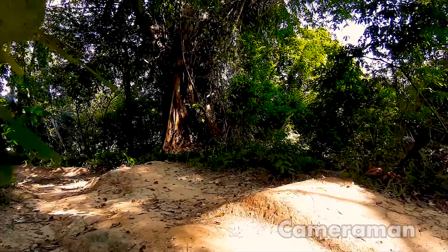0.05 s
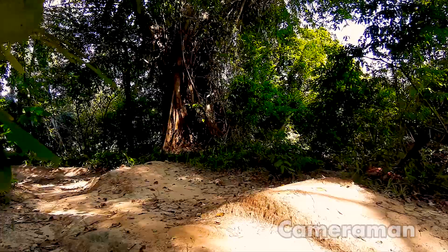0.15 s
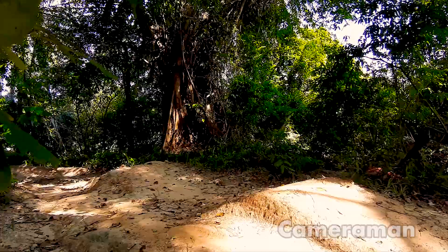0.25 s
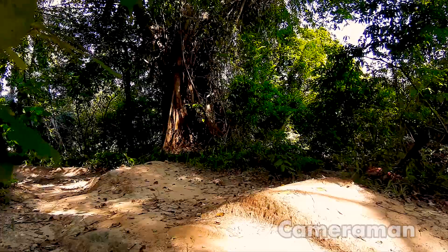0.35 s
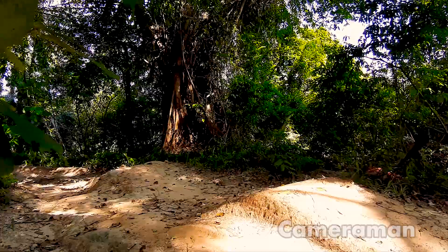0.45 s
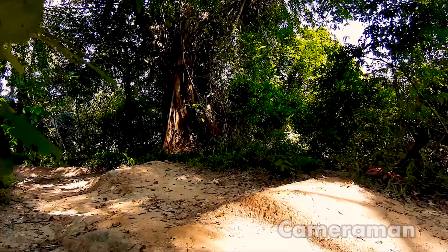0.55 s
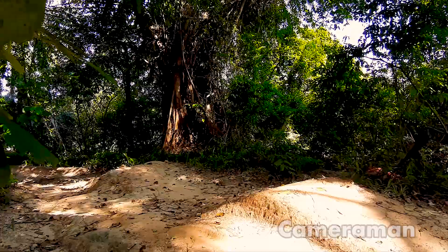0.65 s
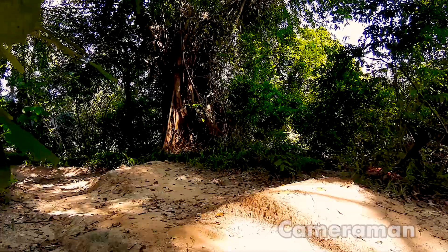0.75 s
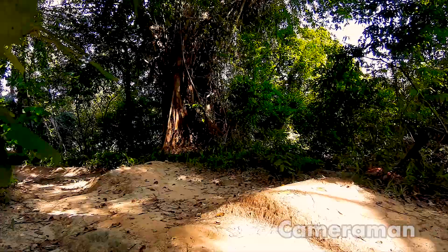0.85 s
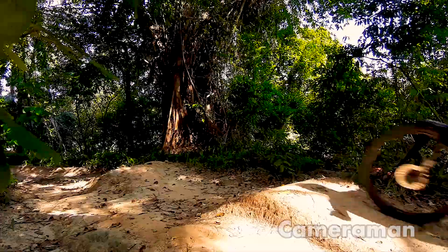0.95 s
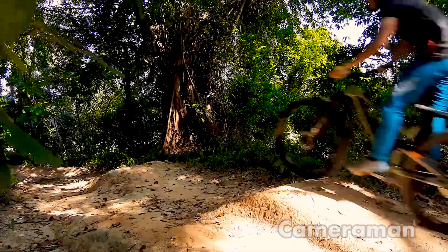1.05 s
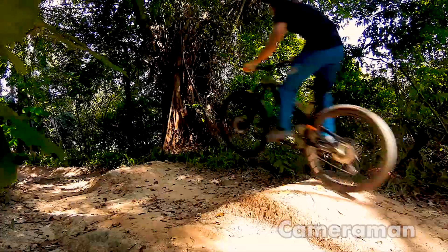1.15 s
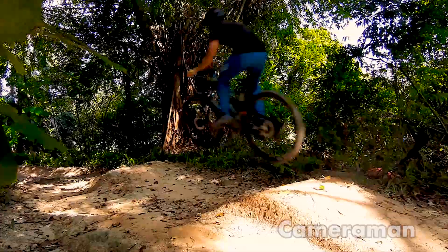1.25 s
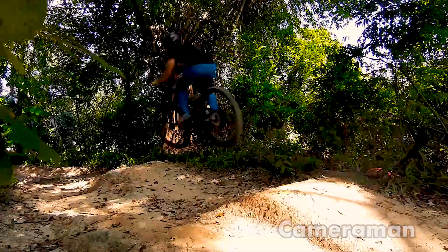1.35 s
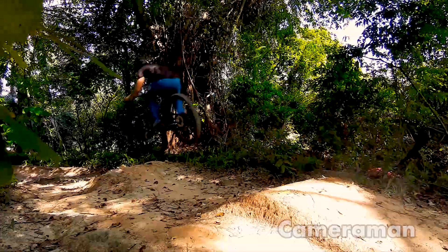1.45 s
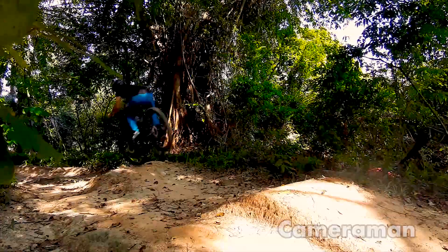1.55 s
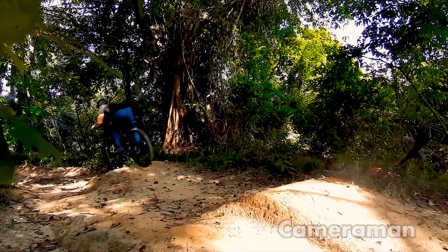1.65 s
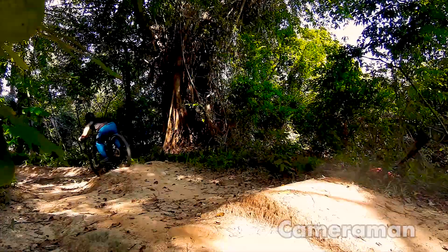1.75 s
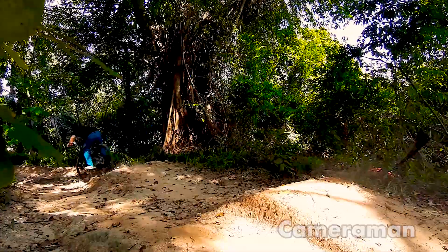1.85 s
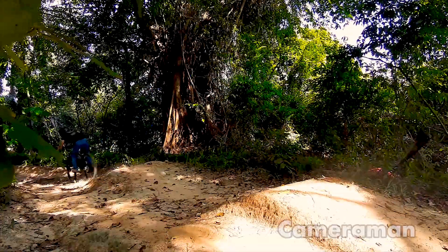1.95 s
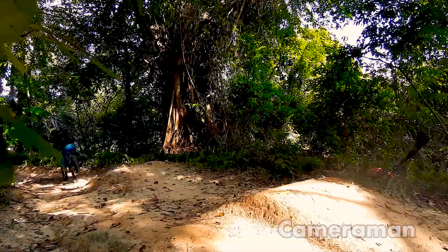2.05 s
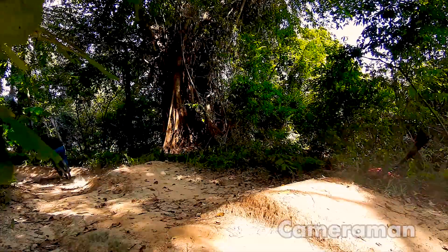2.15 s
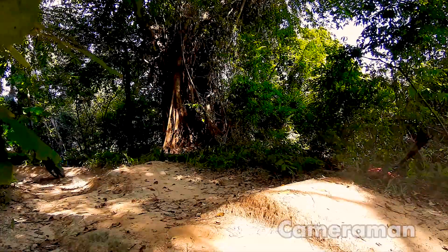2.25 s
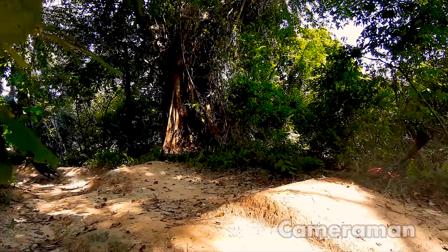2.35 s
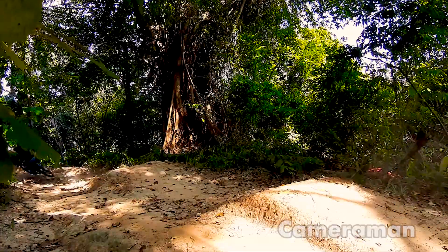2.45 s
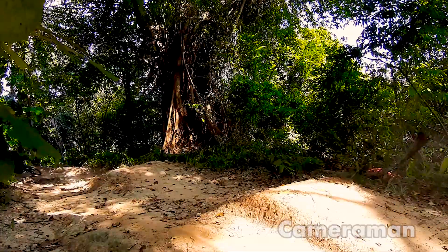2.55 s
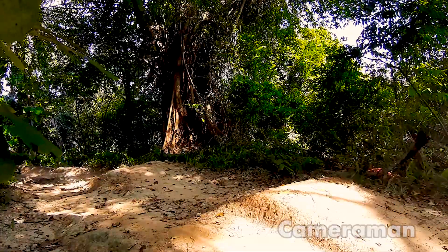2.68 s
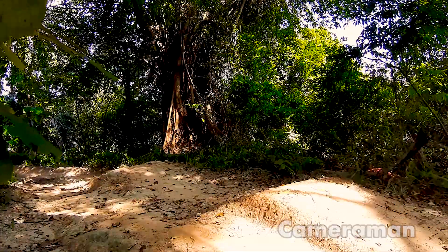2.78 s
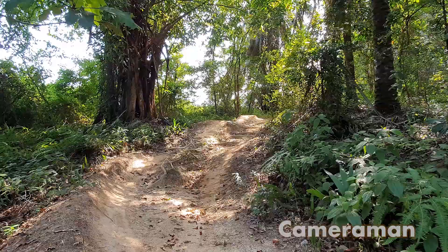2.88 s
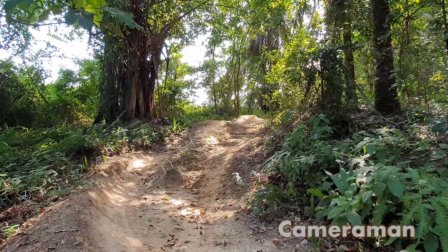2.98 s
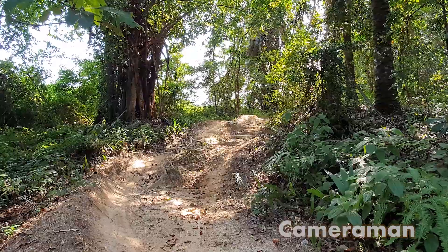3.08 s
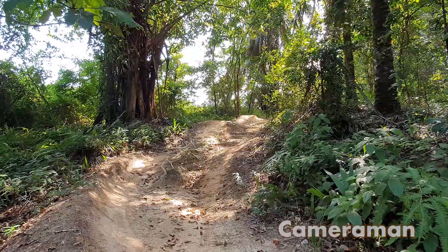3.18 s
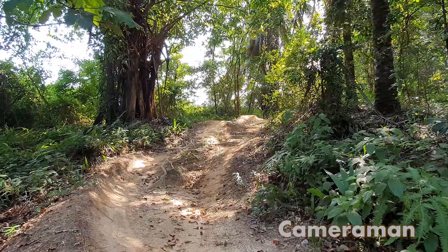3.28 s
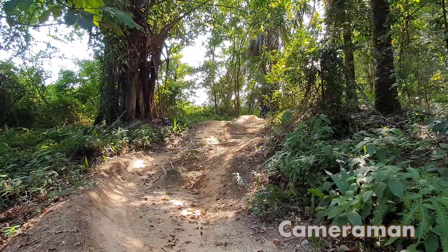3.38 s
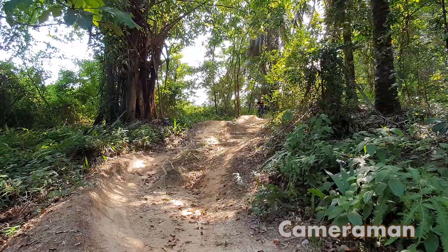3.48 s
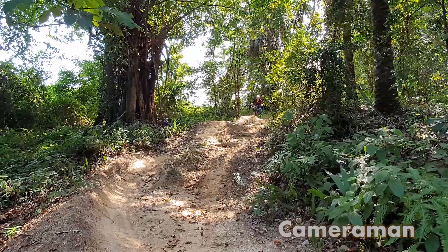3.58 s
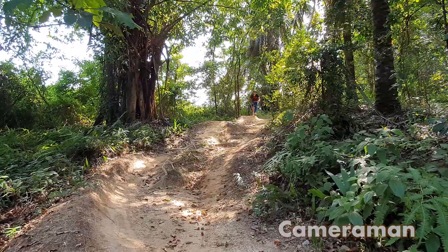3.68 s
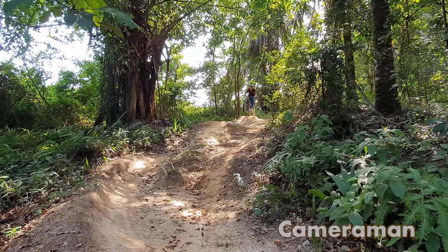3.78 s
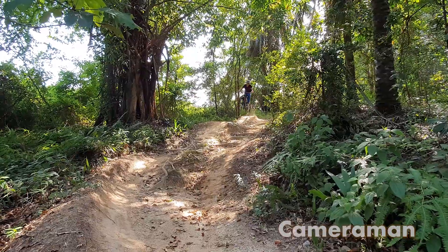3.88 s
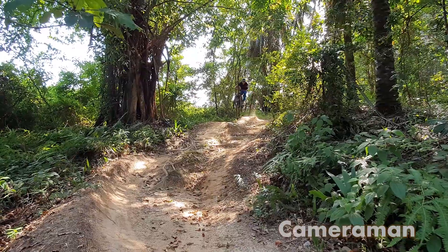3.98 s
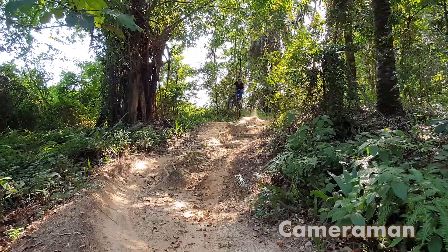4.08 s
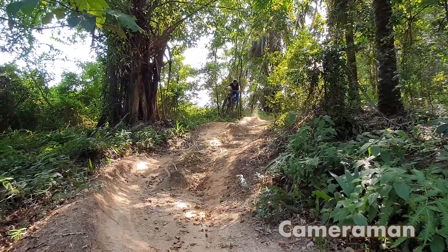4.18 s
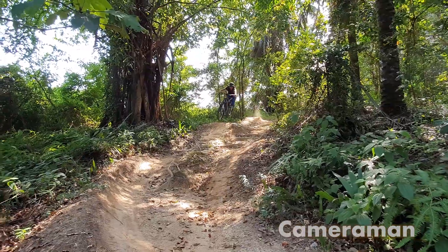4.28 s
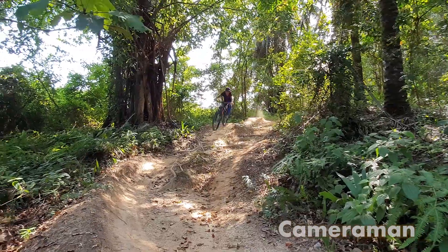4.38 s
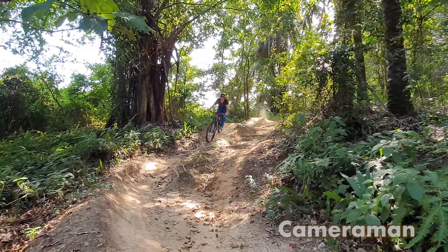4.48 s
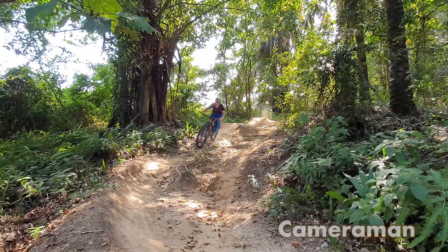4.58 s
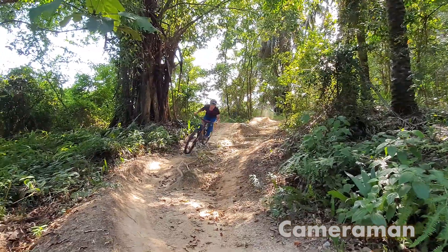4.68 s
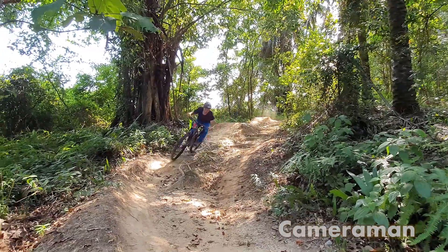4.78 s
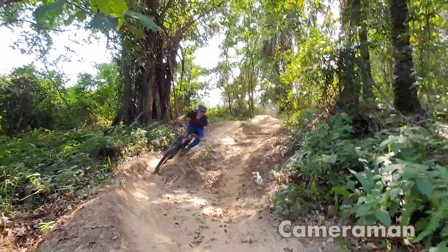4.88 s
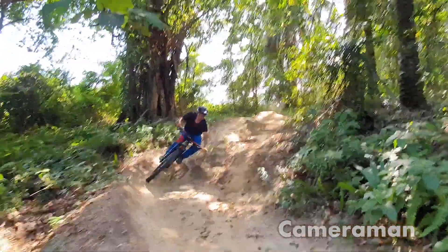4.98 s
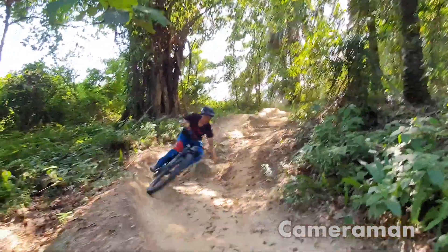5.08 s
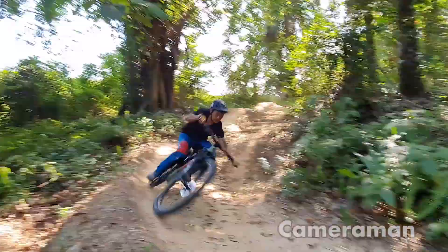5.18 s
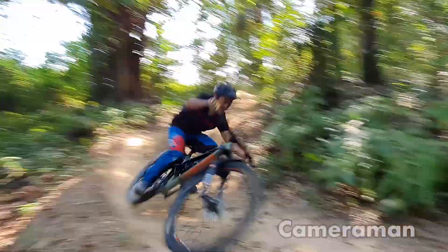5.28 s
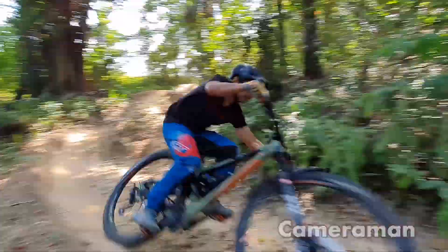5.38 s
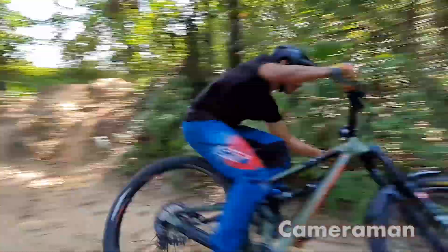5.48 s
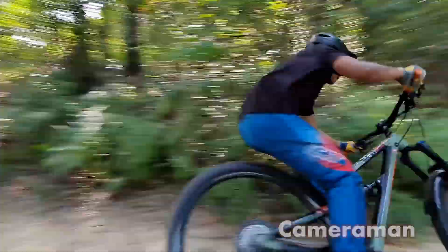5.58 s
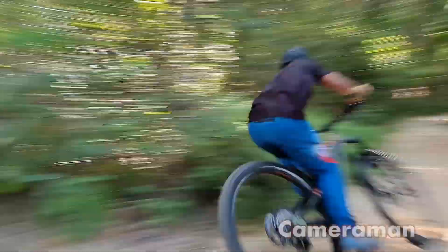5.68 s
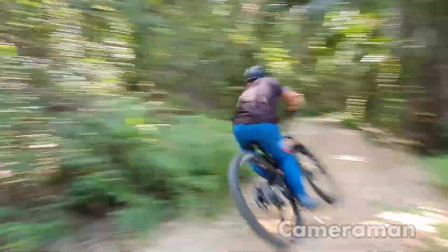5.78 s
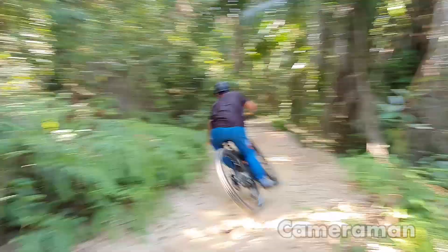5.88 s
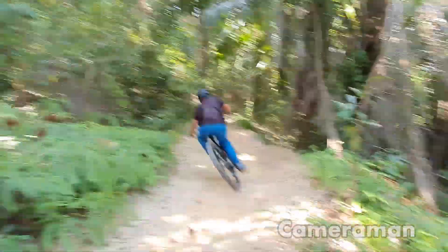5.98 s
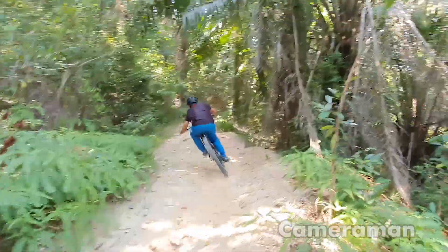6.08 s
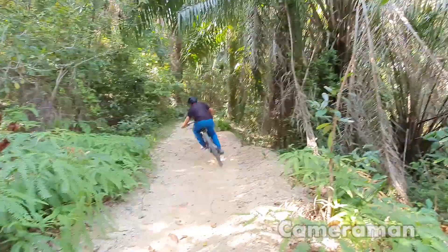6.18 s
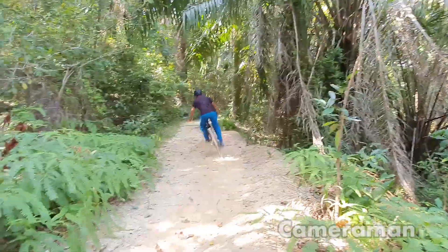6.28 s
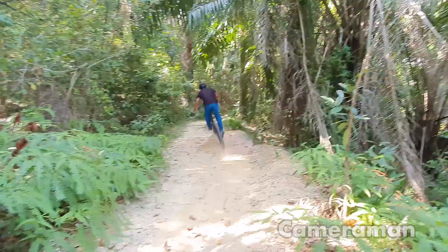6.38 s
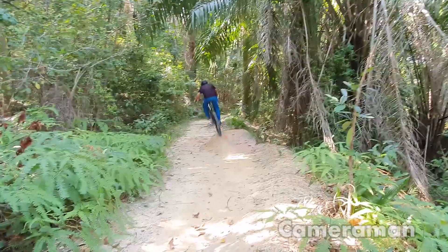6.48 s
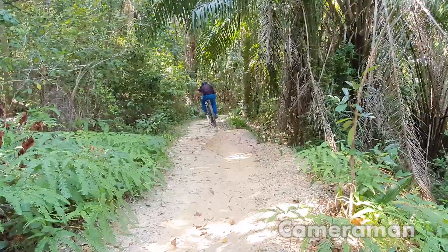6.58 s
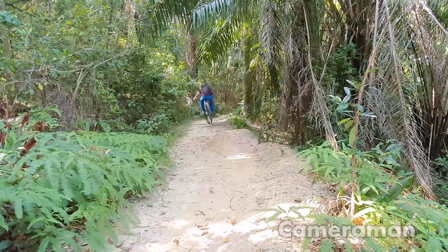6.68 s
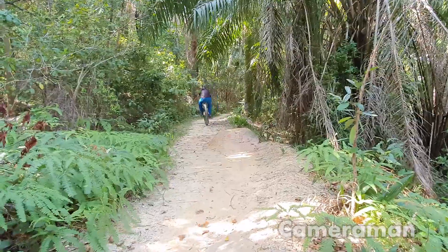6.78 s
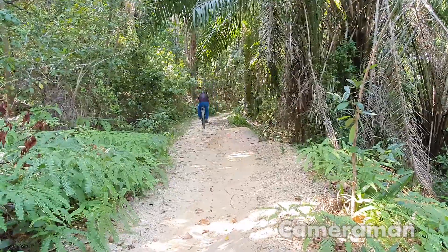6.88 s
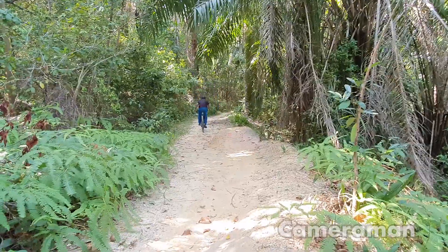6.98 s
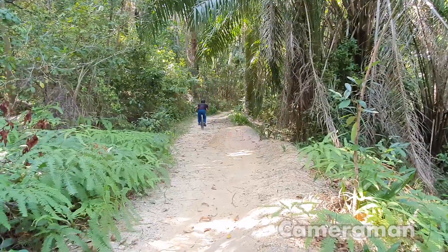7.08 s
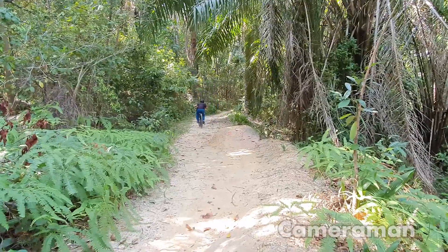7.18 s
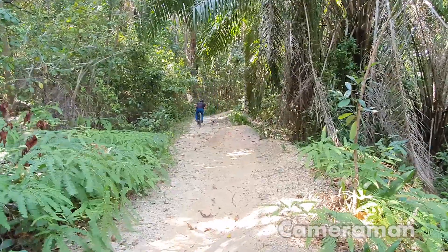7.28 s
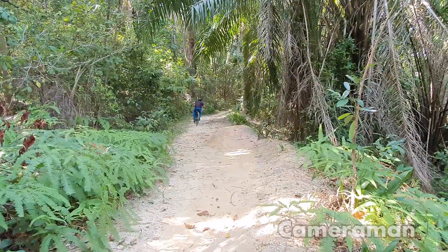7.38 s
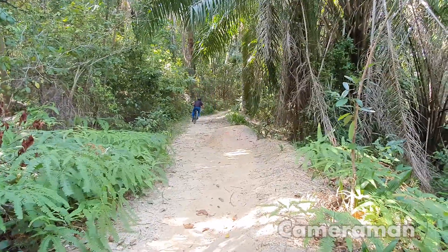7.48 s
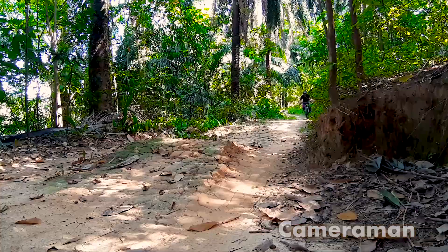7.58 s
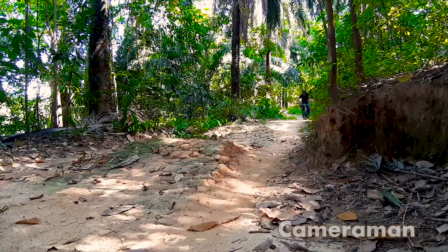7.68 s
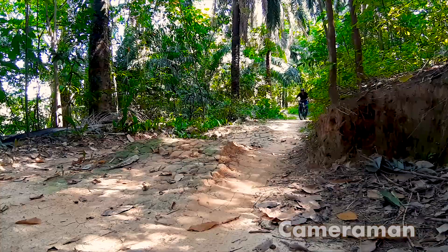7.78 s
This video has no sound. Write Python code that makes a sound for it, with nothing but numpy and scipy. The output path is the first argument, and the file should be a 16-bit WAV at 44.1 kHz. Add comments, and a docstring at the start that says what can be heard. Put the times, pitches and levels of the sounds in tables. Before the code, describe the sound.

A mountain bike rumbles up a dirt jump, lands with a thud, then swoops close past through a gritty forest berm with buffeting wind.

```python
"""Mountain bike on a dirt jump and a forest trail

A bike rolls up a dry jump, flies, lands and rides off; then it drops down a trail, carves a berm about a metre
from the two ports and lands once more farther along; a last spot holds only forest air and an insect.
Noise and ringing grains make the tyres hum, scrub and throw grit; blows ring the frame, stones click, clods
crunch, side knobs drone in the berm. The rider's draught buffets each port as slow noise. Gliding tones make
the birds, a wavering tone the insect, coloured noise the forest air."""
import sys
import numpy as np
from scipy import signal
from scipy.fft import rfft, irfft, next_fast_len
from scipy.io import wavfile
from scipy.ndimage import uniform_filter1d, map_coordinates

SR = 44100
rng = np.random.default_rng(int(sys.argv[2]) if len(sys.argv) > 2 else 0)


def transcribe(u):
    """Save the signal u as a 16-bit wav file named by the first command-line argument.

    u: samples, shape (n,) or (channels, n), limited to [-1, 1]; the rate is SR.
    q: integer samples, one column per channel.
    """
    v = np.clip(np.atleast_2d(u).T, -1, 1)
    q = np.round(v * 32767).astype(np.int16)
    wavfile.write(sys.argv[1], SR, q)


N = 346185
TIME = np.arange(N) / SR


def amp(db):
    """Decibels to gain."""
    return 10 ** (np.asarray(db) / 20)


def unit(x):
    """Scales to rms 1."""
    return x / np.sqrt(np.mean(x ** 2) + 1e-20)


def read(points, hz):
    """Reads a spectrum on a log-frequency axis."""
    f, value = np.transpose(points)
    return np.interp(np.log(hz + 1), np.log(f + 1), value)


def level(s, db):
    """A gain curve through points in dB, at -140 dB outside its span."""
    return amp(np.interp(TIME, s, db, left=-140, right=-140))


def swell(s, half_s):
    """A smooth bump of height 1 around time s."""
    return np.exp(-np.minimum(((TIME - s) / half_s) ** 2, 60))


def envelope(start, end, attack_s, release_s):
    """Straight attack, hold until the end, exponential release."""
    attack = np.clip((TIME - start) / attack_s, 0, 1)
    return attack * np.exp(-np.maximum(TIME - end, 0) / release_s)


def add(mix, s, sound):
    """Mixes a sound in at time s."""
    part = mix[..., max(round(s * SR), 0):][..., :sound.shape[-1]]
    part += sound[..., :part.shape[-1]]


def colour(x, spectrum, size=4096):
    """Causal minimum-phase filter with the given spectrum, falling 20 dB per octave beyond its ends."""
    hz = abs(np.fft.fftfreq(size, 1 / SR)) + 1
    octaves_below = np.maximum(np.log2(spectrum[0][0] / hz), 0)
    octaves_above = np.maximum(np.log2(hz / spectrum[-1][0]), 0)
    gain_db = read(spectrum, hz) - 20 * (octaves_below + octaves_above)
    log_gain = np.log(amp(gain_db) + 1e-6)
    taps = np.fft.ifft(np.exp(np.conj(signal.hilbert(log_gain)))).real
    return signal.oaconvolve(x, taps[None], axes=1)[:, :x.shape[1]]


def resonate(x, hz, width_hz):
    """A steep resonance that follows the pitch hz."""
    turn = np.exp(2j * np.pi * np.cumsum(hz * np.ones(x.shape[-1])) / SR)
    r = np.exp(-np.pi * width_hz / SR)
    # shift the pitch down to zero, smooth with two equal poles, shift back up
    return (turn * signal.lfilter([(1 - r) ** 2], [1, -2 * r, r * r], x / turn)).real


def wobble(rate_hz):
    """Slow random wandering of rms 1, up to the given rate."""
    hz = np.fft.rfftfreq(N, 1 / SR)
    return unit(irfft(rfft(rng.standard_normal(N)) / (1 + (hz / rate_hz) ** 4), N))


# The jump heard from the first spot: moment the bike is closest in seconds, distance in metres,
# speed in metres per second.
JUMP_PASS = (0.95, 0.99, 9.95)
# The descent, berm and far landing heard from the second spot, same columns.
BERM_PASS = (5.652, 1.2, 7.84)
# Stretches of ground: packed run-in, ramp, loose run-out, descent and berm, hard straight, far run-out.
# Each row: start and end in seconds, then casing hum, knob scrub and grit in dB at the closest distance,
# before pressing and the tyre trims.
STRETCHES = [(-0.05, 0.294, -30, -28, -44), (0.267, 1.09, -37.5, -26, -34), (1.712, 2.753, -35.5, -35, -30),
             (4.457, 5.783, -26.5, -23.5, -30.5), (5.959, 6.531, -42.5, -35, -36.5),
             (6.983, 7.55, -34.5, -47, -36)]
# The rider presses the tyres into a dip or turn, or lightens them (negative).
# Each row: middle and half length in seconds, extra hum in dB, extra scrub in dB.
PRESSES = [(0.373, 0.043, 7, 4.5), (1.034, 0.059, 2.5, -4), (2.03, 0.14, 8, 9), (2.503, 0.16, 12.5, 8),
           (5.05, 0.17, 5.5, 9), (5.397, 0.12, 2, 7.5), (5.702, 0.074, -10.5, -3.5), (6.078, 0.091, 7, 8.5),
           (6.33, 0.11, 13.5, 6.5), (7.46, 0.09, -7, 19)]
# Landings and slides throw dirt.
# Each row: start in seconds, grit in dB before the tyre trims, settling in seconds.
SPRAYS = [(0.306, -40, 0.041), (1.707, -33, 0.17), (4.466, -40, 0.35), (4.663, -42.5, 1),
          (5.534, -27.5, 0.047), (7.01, -40, 0.1)]
BITE_S, RELEASE_S = 0.045, 0.11  # the tyres take hold of a stretch and leave it
GRIT_PER_PRESS = 0.092  # dB of grit for each dB of extra hum
SPRAY_RISE_S, SPRAY_HUM_DB, SPRAY_SCRUB_DB = 0.0091, -9, -2  # hum and scrub relative to the grit


def ride(passing, spot):
    """Gains of hum, scrub and grit at one spot: ground times pressure over distance, plus thrown dirt."""
    closest_s, distance, speed = passing
    nearness = distance / np.hypot(distance, speed * (TIME - closest_s))
    ground_power = 0
    for start, end, *dbs in STRETCHES:
        ground_power += np.outer(amp(dbs), envelope(start, end, BITE_S, RELEASE_S)) ** 2
    press_db = 0
    for s, half_s, hum, scrub in PRESSES:
        press_db += np.outer([hum, scrub, GRIT_PER_PRESS * hum], swell(s, half_s))
    spray = sum(amp(db) * envelope(s, s, SPRAY_RISE_S, settle_s) for s, db, settle_s in SPRAYS)
    thrown = np.outer(amp([SPRAY_HUM_DB, SPRAY_SCRUB_DB, 0]), spray)
    rolled = np.sqrt(ground_power) * amp(press_db) * nearness
    present = (TIME >= spot[0][0]) * (TIME < spot[-1][0])
    return np.hypot(rolled, thrown) * present


# Colours of the tyres on the hard jump.
# Each row: frequency in Hz, density in dB per Hz before scaling to rms 1.
JUMP_HUM = [(110, -17), (225, 1), (290, -4), (500, -4), (1100, -10.5)]
JUMP_SCRUB = [(1200, -12), (1650, -5.5), (2250, -8), (3000, -14.5)]
JUMP_GRIT = [(2600, -3), (4500, 2.5), (7700, 2), (9000, -2.5), (16000, -1.5)]
# Colours of the tyres in the soft berm and beyond, same columns.
BERM_HUM = [(70, 5), (150, -6), (215, 7), (290, -2), (560, 0), (1100, -10.5)]
BERM_SCRUB = [(900, -5), (1280, -1.5), (1750, -2), (3000, -16.5)]
BERM_GRIT = [(2600, 2), (4200, 3), (7600, -4), (16000, -14)]


def tyres(gains, hum, scrub, grit, hum_db, scrub_db, grit_db, bumps_db, grit_spread_db, dust):
    """Knobs drum on the casing, scrub over the soil and crush grit; bumps load all three together."""
    load_db = wobble(47) * bumps_db
    drumming = colour(rng.standard_normal((2, N)), hum)
    drumming = unit(drumming * amp(.5 * load_db))
    slipping = colour(grains(2400, 1.2, top_hz=3355, ring_s=0.0017), scrub)
    slipping = unit(slipping * amp(load_db))
    crumbs = grains(3000, grit_spread_db, top_hz=16770) + 0.68 * snaps()
    crushing = colour(crumbs + dust * rng.standard_normal((2, N)), grit)
    crushing = unit(crushing * amp(.5 * load_db))
    out = drumming * gains[0] * amp(hum_db)
    out += slipping * gains[1] * amp(scrub_db)
    return out + crushing * gains[2] * amp(grit_db)


def grains(per_s, spread_db, top_hz, ring_s=0.0014, crack=0.99, count=22, size=300):
    """Crowds of tiny fractures of uneven size; each kind of crumb rings briefly at its own pitch."""
    out, t = np.zeros((2, N)), np.arange(size) / SR
    chance, strength, kind = rng.random(N), rng.exponential(1, N), rng.integers(0, count, N)
    hits = amp(spread_db * np.minimum(strength, 4)) * (chance < per_s / SR)
    hits = hits * rng.choice([-1, 1], (2, N))
    for k in range(count):
        hz = top_hz * (k + 1) / count
        tone = np.sin(2 * np.pi * (hz * t + rng.random((2, 1))))
        crumb = (tone + crack * rng.standard_normal((2, size))) * np.exp(-t / ring_s)
        out += signal.oaconvolve(hits * (kind == k), crumb, axes=1)[:, :N]
    return unit(out)


def snaps(per_s=70, spread_db=4, snap_s=0.003):
    """Now and then a larger crumb splits with a dry, toneless snap."""
    strength = np.minimum(rng.exponential(1, N), 3)
    hits = (rng.random(N) < per_s / SR) * amp(spread_db * strength)
    decaying = signal.lfilter([1], [1, -np.exp(-1 / (snap_s * SR))], hits)
    return unit(decaying * rng.standard_normal((2, N)))


# The side knobs through the berm. Each row: time in seconds, pitch in Hz, level in dB.
DRONE = [(4.8, 425, -48), (4.98, 487, -34), (5.2, 473, -29), (5.39, 572, -32), (5.6, 600, -43)]


def drone(width_hz=130):
    """Leaning into the berm, the side knobs strike the soil at a ragged pitch that mostly climbs."""
    s, hz, db = np.transpose(DRONE)
    ragged = resonate(rng.standard_normal((2, N)), np.interp(TIME, s, hz), width_hz)
    return unit(ragged) * level(s, db)


# Clods of dry dirt crushed under the tread.
# Each row: start in seconds, level in dB, length in seconds, pitch in Hz.
CRUNCHES = [(0.638, -37, 0.039, 1860), (0.82, -35.5, 0.048, 1920), (0.994, -32, 0.03, 7760),
            (2.143, -45, 0.13, 3920), (4.648, -37.5, 0.051, 6200), (5.375, -26, 0.017, 6570),
            (5.539, -26, 0.1, 2390), (5.671, -28.5, 0.035, 2370), (5.724, -34.5, 0.058, 3600)]


def crunches(width_share=0.69):
    """A clod breaks: a quick burst of coarse fractures around one pitch."""
    out, fractures = np.zeros((2, N)), grains(2000, 4.4, top_hz=6900)
    for s, db, length, hz in CRUNCHES:
        piece = fractures[:, round(s * SR):][:, :round(length * SR)]
        burst = unit(resonate(piece, hz, width_share * hz))
        t = np.arange(burst.shape[1]) / SR
        add(out, s, burst * np.interp(t, [0, length / 4, length], [0, amp(db), 0]))
    return out


# Wheels hitting the ground and jolting the frame. Each row: start in seconds, level in dB.
KNOCKS = [(0.879, -24), (1.607, -27.5), (1.712, -21.5), (4.449, -31), (4.514, -26), (4.591, -24.5),
          (4.666, -24), (4.679, -21), (4.737, -22), (4.805, -22), (5.085, -19.5), (5.737, -20.5),
          (7.007, -34)]
# What a jolt rings with. Each row: nominal pitch in Hz, nominal strength in dB; both vary from blow to blow.
FRAME = [(240, 5), (340, 12), (1280, 10), (1600, 6)]


def knocks(ring_db=-8, thud_db=-10, rattle=0.7, rattle_s=0.012, t60=0.017,
           thump_db=-9, thump_hz=90, thump_s=0.015):
    """A blow and a brief rattle of loose parts ring the frame; the tyre gives a dull thud and a low thump."""
    out, t = np.zeros((2, N)), np.arange(SR // 4) / SR
    for s, db in KNOCKS:
        sparse = rng.standard_normal((2, len(t))) * (rng.random(len(t)) < .03)
        blow = sparse * rattle * np.exp(-t / rattle_s)
        blow[0, 0] += 1
        ring = 0
        for hz, mode_db in FRAME:
            decay = amp(mode_db + 2.2 * rng.standard_normal() - 60 * t / t60)
            ring += decay * np.sin(2 * np.pi * hz * (1 + 0.027 * rng.standard_normal()) * t)
        frame = signal.fftconvolve(blow, ring[None], axes=1)[:, :len(t)]
        thud = colour(blow, [(180, 14.5), (1750, 2.5), (3200, -21.5)])
        sound = 0
        for part, part_db in ((frame, ring_db), (thud, thud_db)):
            sound = sound + amp(part_db) * part / part[0, :SR // 100].std()  # levelled over the first 10 ms
        sound[0] += amp(thump_db) * np.sin(2 * np.pi * thump_hz * t) * np.exp(-t / thump_s)
        add(out, s, amp(db) * sound)
    return out


# Stones flicked by the tread and chain links snapping.
# Each row: start in seconds, level in dB before the click trim, pitch in Hz.
CLICKS = [(0.934, -31.5, 4360), (0.979, -32.5, 7400), (1.733, -26, 11600), (1.7645, -29.5, 4800),
          (1.8645, -32.5, 5300), (4.682, -28, 7500), (4.755, -41.5, 3810), (4.846, -37, 4390),
          (5.3246, -29.5, 3280), (5.464, -34, 5840), (6.3548, -34.5, 2310), (6.599, -44.5, 3370)]


def clicks(click_db=-7, ring=2.1, width_hz=800, snap=9):
    """A stone or link gives one dry snap and rings for an instant at its own pitch."""
    out, t = np.zeros((2, N)), np.arange(SR // 10) / SR
    r = np.exp(-np.pi * width_hz / SR)
    for s, db, hz in CLICKS:
        contact = rng.standard_normal((2, len(t))) * np.exp(-t / 0.002)
        contact[0, 0] += snap
        crack = colour(contact, [(800, 12.5), (16000, -4.0)])
        pole = r * np.exp(2j * np.pi * hz / SR)
        tone = signal.lfilter([np.sqrt(2 * (1 - r * r))], [1, -pole], contact).real
        add(out, s, amp(db + click_db) * (crack + ring * tone))
    return out


# Where the bike is. Each row: time in seconds, lag of the left port behind the right in milliseconds.
BEARING = [(0.8, 0.52), (1.65, -0.11), (2.4, -0.36), (4.5, -0.021), (5.3, -0.042), (5.56, 0.19),
           (5.95, -0.079)]
SHADE_DB_PER_MS = 5.5  # the camera body shades the treble of the far port


def placed(pair):
    """The bike reaches the far port later and duller, the near port earlier and brighter."""
    lag_ms = np.interp(TIME, *np.transpose(BEARING))
    far = np.array([lag_ms, -lag_ms]) / 2
    treble = signal.sosfilt(signal.butter(1, 2000, "high", fs=SR, output="sos"), pair)
    shaded = pair + treble * (amp(-SHADE_DB_PER_MS * far) - 1)
    heard_at = (TIME - far / 1000) * SR
    return np.array([map_coordinates(port, [at], order=5) for port, at in zip(shaded, heard_at)])


# How unlike the two ports hear the scene. Each row: frequency in Hz, gain of the side signal in dB.
WIDTH = [(60, -9), (250, -12), (700, -11), (1300, -6), (2400, -2), (4400, 0)]


def ports(pair):
    """Mid and side to left and right: the bass reaches both ports more alike."""
    side = irfft(rfft(pair[1]) * amp(read(WIDTH, np.fft.rfftfreq(N, 1 / SR))), N)
    return np.array([pair[0] + side, pair[0] - side])


# Colour of the buffeting. Each row: frequency in Hz, gain in dB before levelling.
BUFFET = [(30, -19.5), (60, 3), (85, 4), (130, -5.5), (600, -37.5)]
# The wake that trails the rider, left port then right.
# Each row: arrival in seconds, level on arrival in dB before the wake trim, fade in dB per second.
WAKE = [(5.59, -21.5, 13), (5.555, -12.5, 81)]
# Eddies hitting the left port and grazing the right.
# Each row: middle and half length in seconds, left level in dB.
EDDIES = [(5.222, 0.036, -25), (5.624, 0.022, -11.5), (5.853, 0.059, -13.5), (5.89, 0.033, -9.5),
          (6.235, 0.02, -22.5), (6.331, 0.055, -27), (7.015, 0.023, -23.5), (7.15, 0.085, -24.5),
          (7.354, 0.05, -26.5), (7.445, 0.058, -23.5)]
WAKE_RISE_S = 0.015


def wind(wake_db=-1, right_db=-18, steepening=0.22):
    """The rider's wake and its eddies push on each port separately; strong eddies have sharp crests."""
    noise = colour(rng.standard_normal((2, N)), BUFFET)
    swirl = signal.hilbert(noise, next_fast_len(N))[:, :N]
    # even out the slow swings of strength
    swirl = swirl.real / np.sqrt(uniform_filter1d(abs(swirl) ** 2, size=1300, axis=1) / 2 + 1e-12)
    start, db, fade = np.transpose(WAKE)[..., None]
    age = np.maximum(TIME - start, 0)
    arrived = np.minimum(age / WAKE_RISE_S, 1) * (TIME < BERM_SPOT[-1][0])
    power = (arrived * amp(db + wake_db - fade * age)) ** 2
    for s, half_s, eddy_db in EDDIES:
        power += np.outer(amp([0, right_db]) * amp(eddy_db), swell(s, half_s)) ** 2
    force = np.sqrt(power)
    out = force * (swirl + steepening * np.minimum(force / 0.057, 1) * (swirl ** 2 - 1))
    return signal.sosfilt(signal.butter(2, 30, "high", fs=SR, output="sos"), out)


# Tight eddies that thump on the left port. Each row: crest in seconds, level in dB.
THUMPS = [(5.84, -4), (5.8757, -6), (6.031, -11.5), (6.119, -8)]


def thumps(period_s=0.012):
    """A tight eddy crosses the left port: one sharp crest of pressure between two troughs."""
    out = np.zeros((2, N))
    for s, db in THUMPS:
        turns = (TIME - s) / period_s
        fade = np.exp(-np.minimum(2 * np.hypot(turns, .04), 60))  # the small offset rounds the tip
        out[0] += amp(db) * np.cos(2 * np.pi * turns) * fade
    return out


# A small bird's row of chips: first in seconds, until in seconds, interval in seconds.
CHIPS = (3.04, 4.5, 0.192)
# Notes of a thin warbled call.
# Each row: delay and length in seconds, middle pitch in Hz, relative level in dB.
WARBLE = [(0, 0.033, 5500, -3.5), (0.036, 0.016, 5130, -1), (0.041, 0.03, 5770, -3.5),
          (0.066, 0.072, 5620, -14.5)]
# When the call sounds. Each row: start in seconds, level in dB.
CALL_TIMES = [(2.364, -44), (4.46, -33.5)]


def birds(chip_db=-48, chip_hz=5040, fall_hz=520, chip_s=0.019, hoarse_db=3):
    """Falling tones: a row of chips, and a call of quick notes made hoarse by random pitch and level."""
    out, u = np.zeros(N), np.linspace(-.5, .5, round(chip_s * SR))
    chip = np.sin(2 * np.pi * np.cumsum(chip_hz - fall_hz * u) / SR) * np.cos(np.pi * u) ** 2
    for s in np.arange(*CHIPS):
        add(out, s, amp(chip_db) * chip)
    waver_hz, flutter_db = 130 * wobble(350), hoarse_db * wobble(150)
    for s, db in CALL_TIMES:
        for delay, length, hz, note_db in WARBLE:
            u = np.linspace(-.5, .5, round(length * SR))
            now = round((s + delay) * SR) + np.arange(len(u))
            pitch = hz - fall_hz * u / 2 + waver_hz[now]
            note = np.sin(2 * np.pi * np.cumsum(pitch) / SR) * np.cos(np.pi * u)
            add(out, s + delay, amp(db + note_db + flutter_db[now]) * note)
    return out


# The two falling voices of a squeak. Each row: start in seconds, level in dB, middle pitch in Hz.
SQUEAK = [(3.758, -45.5, 3800), (3.765, -48, 6300)]


def squeak(width_hz=450, fall_hz=1300, length_s=0.054):
    """A short hoarse squeak: noise through two falling resonances."""
    out, u = np.zeros(N), np.linspace(-.5, .5, round(length_s * SR))
    for s, db, hz in SQUEAK:
        voice = unit(resonate(rng.standard_normal(len(u)), hz - fall_hz * u, width_hz))
        add(out, s, amp(db) * voice * np.cos(np.pi * u) ** 2)
    return out


INSECT_HZ, INSECT_DB = 12200, -66


def insect(interval_s=0.065, swell_s=0.12):
    """One shrill wavering tone at the last spot swells in and sounds in quick pulses."""
    age = np.maximum(TIME - LAST_SPOT[0][0], 0)
    pulses = np.sin(np.pi * (age / interval_s % 1)) * np.minimum(age / swell_s, 1)
    tone = np.sin(2 * np.pi * np.cumsum(INSECT_HZ + 45 * wobble(180)) / SR)
    return amp(INSECT_DB) * pulses * unit(tone)


# Colour of the forest at the jump, by the berm and at the last spot.
# Each row: frequency in Hz, density in dB per Hz before scaling to rms 1.
AIR_JUMP = [(75, -9.5), (108, 4), (180, -13.5), (232, -7.5), (320, -19), (620, -13), (1000, -23),
            (5000, -24), (7800, -27.5), (9200, -33), (16000, -36)]
AIR_BERM = [(30, -10.5), (64, 3), (137, -6.5), (360, -14), (950, -15), (1400, -20), (5000, -25.5),
            (16000, -46)]
AIR_LAST = [(40, -8), (280, -5.5), (900, -18.5), (4200, -21.5), (4950, -15.5), (5700, -25.5),
            (16000, -37.5)]
# Level of the forest while listening at each spot. Each row: time in seconds, level in dB before the waver.
JUMP_SPOT = [(0, -43), (2.919, -43.5)]
BERM_SPOT = [(2.92, -43.5), (4.4, -43.5), (6.9, -49.5), (7.552, -46)]
LAST_SPOT = [(7.55, -50.5), (7.86, -52)]


def forest_air(waver_db=1.5):
    """Far rumble, leaves and insect hiss at each spot, as coloured noise of wavering level."""
    out = 0
    for spot, air in ((JUMP_SPOT, AIR_JUMP), (BERM_SPOT, AIR_BERM), (LAST_SPOT, AIR_LAST)):
        hiss = unit(colour(rng.standard_normal((2, N)), air))
        out = out + hiss * level(*np.transpose(spot)) * amp(waver_db * wobble(4.3))
    return out


FOREST_T60 = 0.53  # seconds for the echo to fall by 60 dB


def trees(x):
    """Trunks and leaves scatter a thin, short echo to each port."""
    t = np.arange(SR // 2) / SR
    tail = rng.standard_normal((2, len(t))) * (rng.random((2, len(t))) < .05) * (t > .006)
    tail *= amp(-60 * t / FOREST_T60)
    return ports(signal.fftconvolve(x[None], tail / np.linalg.norm(tail[0]), axes=1)[:, :N])


def scene():
    """The bike, its echo, the forest and the draught."""
    rolling = tyres(ride(JUMP_PASS, JUMP_SPOT), JUMP_HUM, JUMP_SCRUB, JUMP_GRIT,
                    hum_db=2.0, scrub_db=-8.0, grit_db=0.5, bumps_db=2.5, grit_spread_db=5.0, dust=0.98)
    rolling += tyres(ride(BERM_PASS, BERM_SPOT), BERM_HUM, BERM_SCRUB, BERM_GRIT,
                     hum_db=3.0, scrub_db=-8.0, grit_db=-3.0, bumps_db=2.0, grit_spread_db=4.0, dust=0.9)
    rolling += drone() + crunches()
    hits = knocks() + clicks()
    bike = placed(ports(rolling + hits))
    song = birds() + squeak()
    echo = trees(amp(-17.0) * rolling[0] + amp(-6) * hits[0] + amp(-5.0) * song)
    return bike + echo + song + ports(forest_air()) + insect() + wind() + thumps()


# How the two ports differ in colour. Each row: frequency in Hz, left minus right in dB.
PORT_COLOUR = [(2000, 0.5), (5500, -2.5), (10000, 2.5)]
EDGE_HZ = 15950  # upper band limit


def record(dry):
    """Each port's colour, the full-scale limit, then the band limit."""
    tilt_db = np.outer([.5, -.5], read(PORT_COLOUR, np.fft.rfftfreq(N, 1 / SR)))
    heard = irfft(rfft(dry) * amp(tilt_db), N)
    edge = signal.firwin(801, EDGE_HZ, window=("kaiser", 9), fs=SR)
    return signal.oaconvolve(np.clip(heard, -1, 1), edge[None], "same", axes=1)


dry = scene()
out = record(dry)
transcribe(out)
```